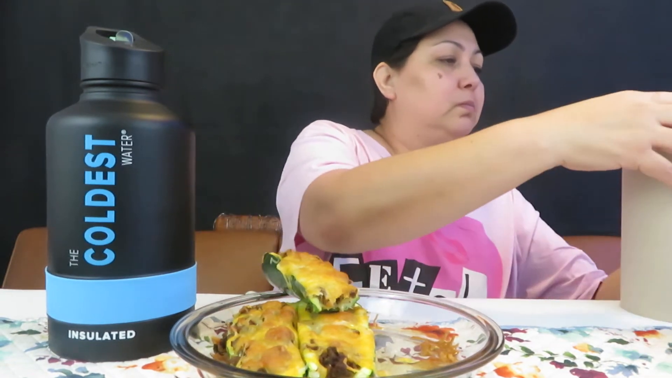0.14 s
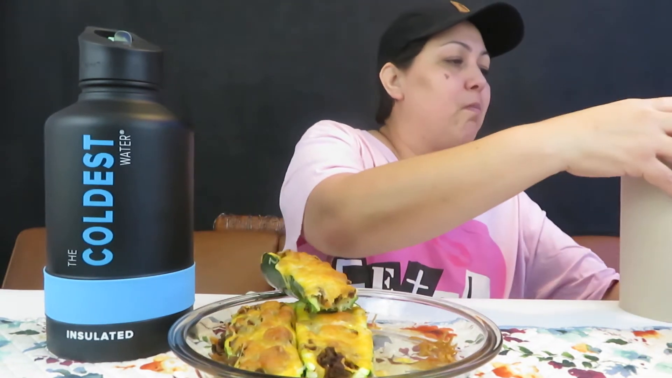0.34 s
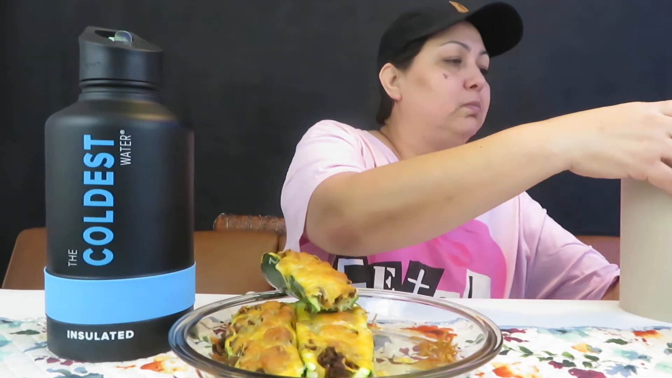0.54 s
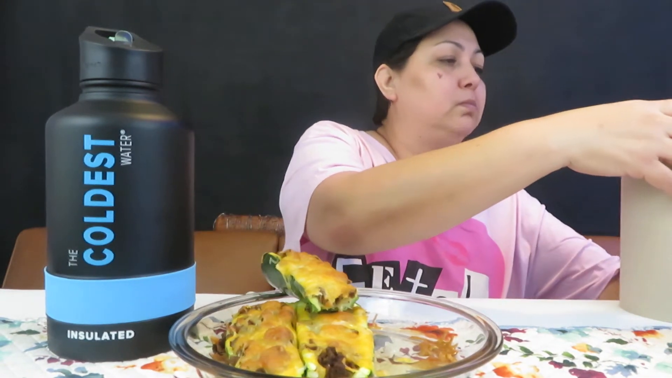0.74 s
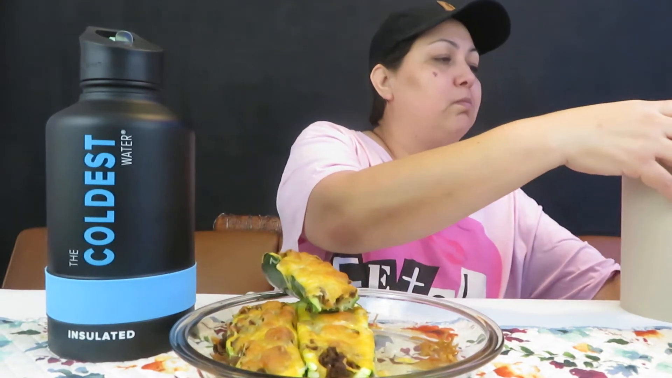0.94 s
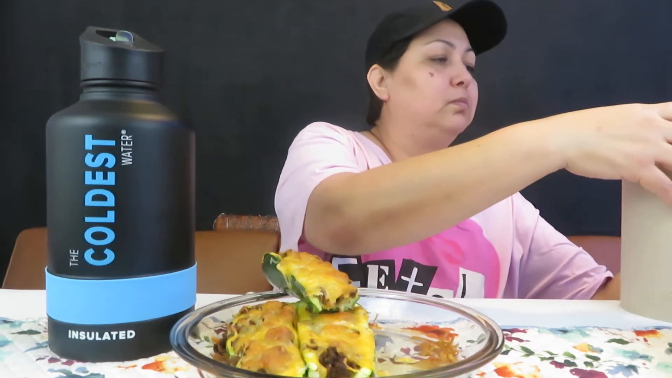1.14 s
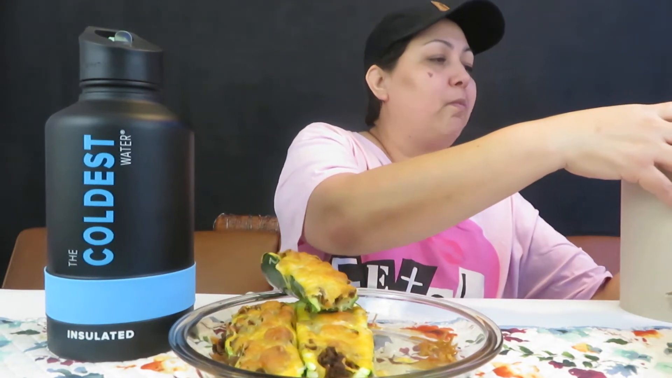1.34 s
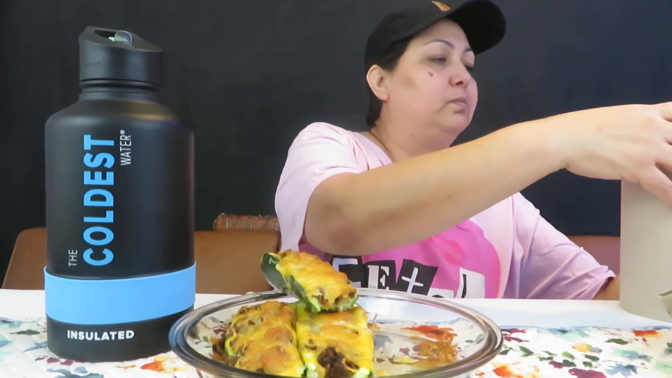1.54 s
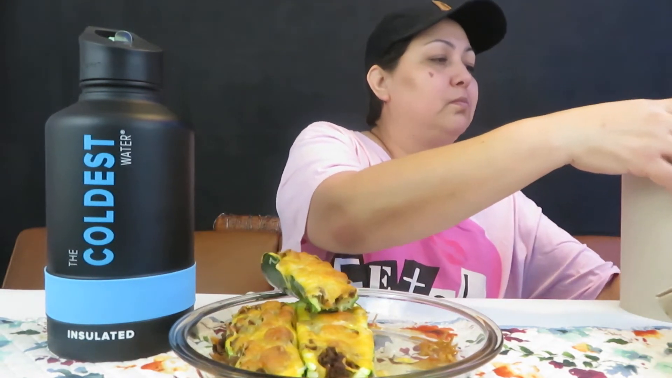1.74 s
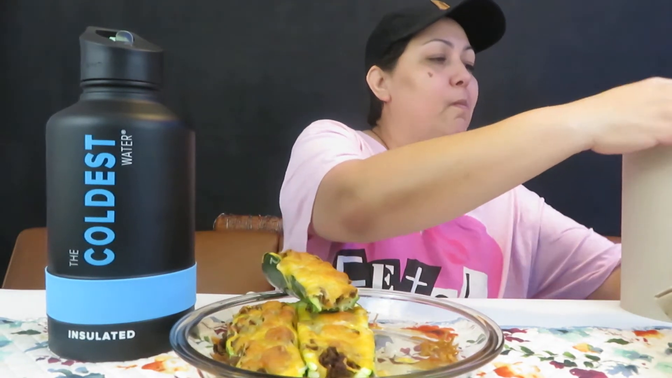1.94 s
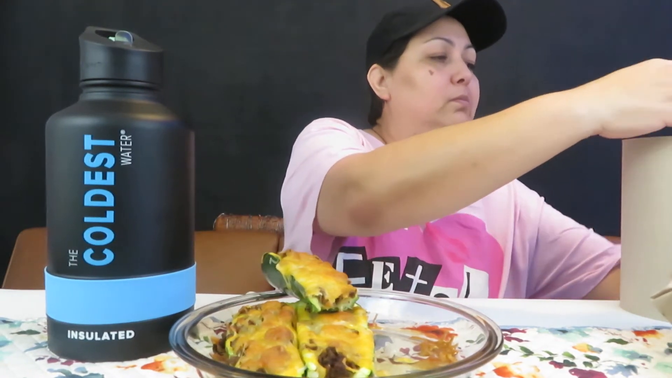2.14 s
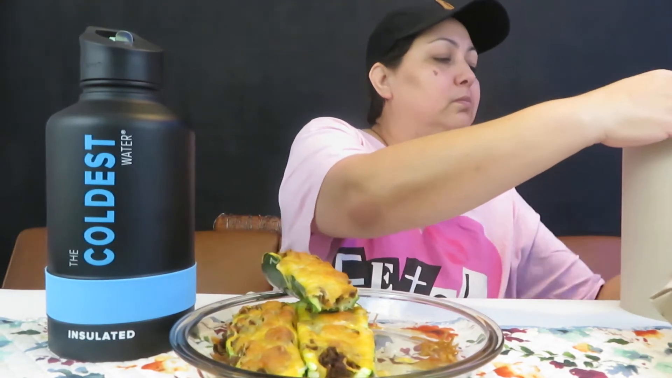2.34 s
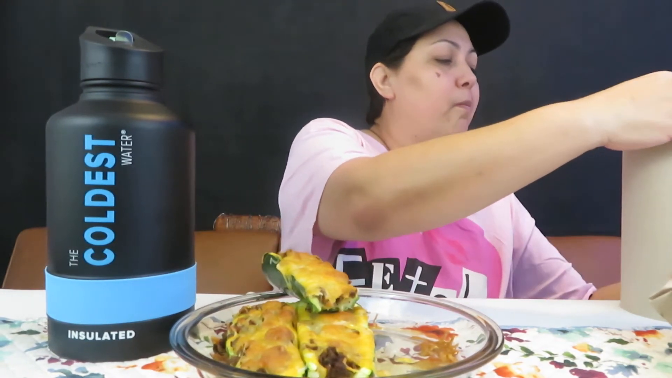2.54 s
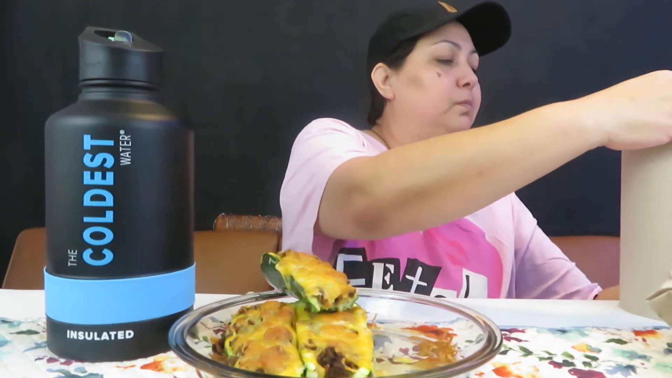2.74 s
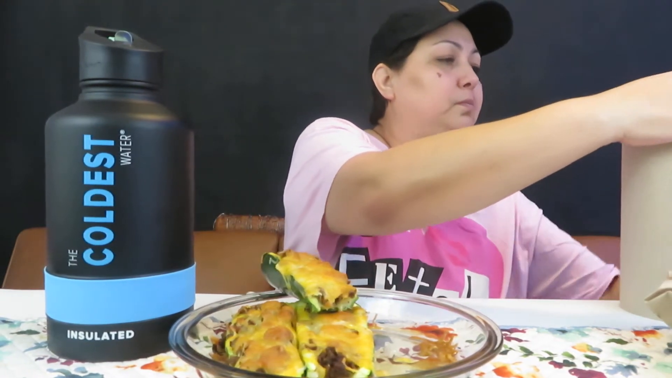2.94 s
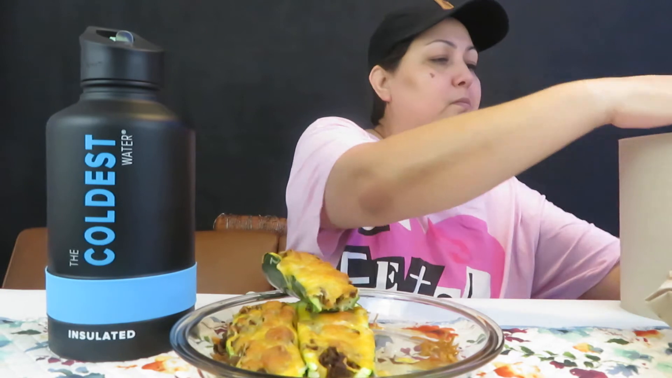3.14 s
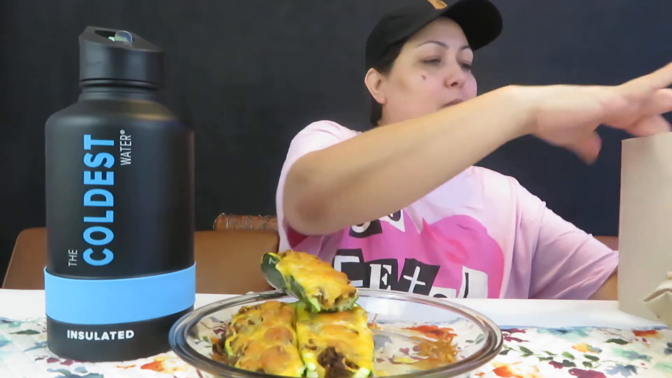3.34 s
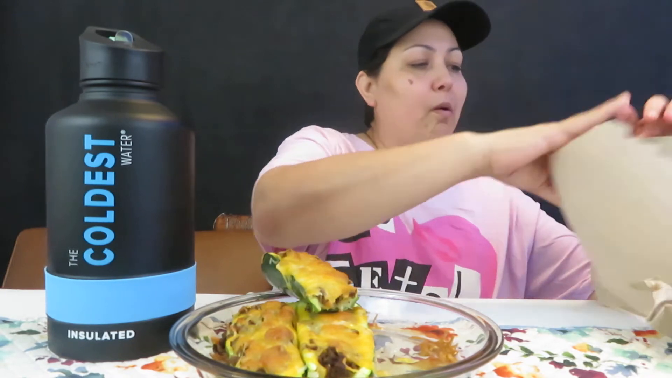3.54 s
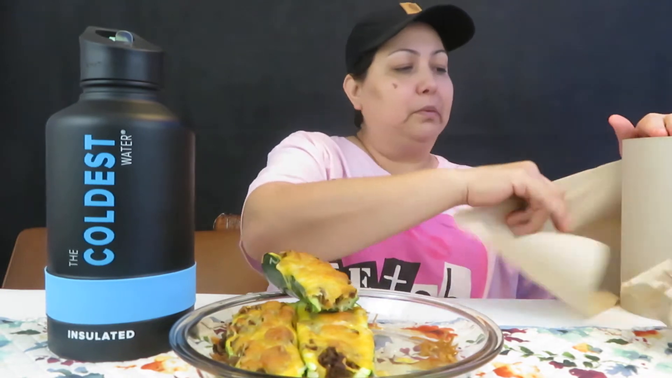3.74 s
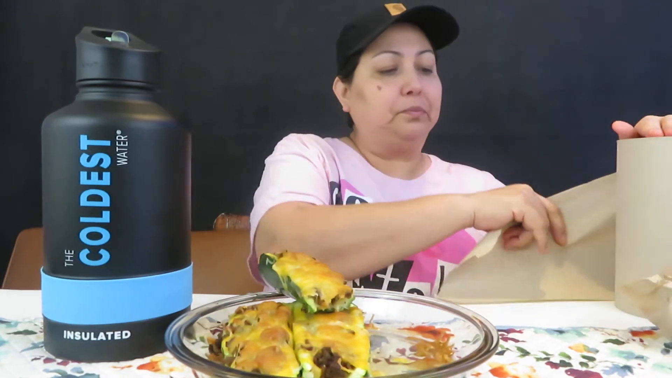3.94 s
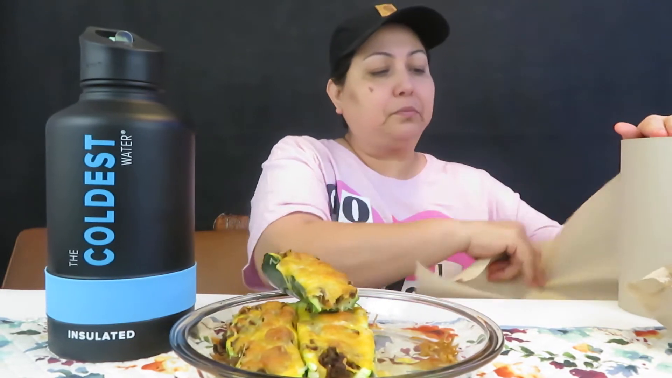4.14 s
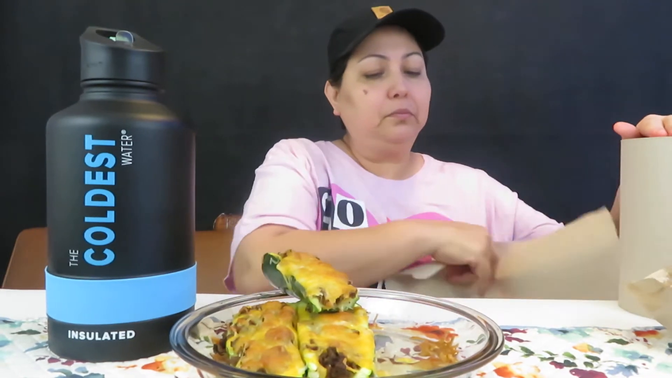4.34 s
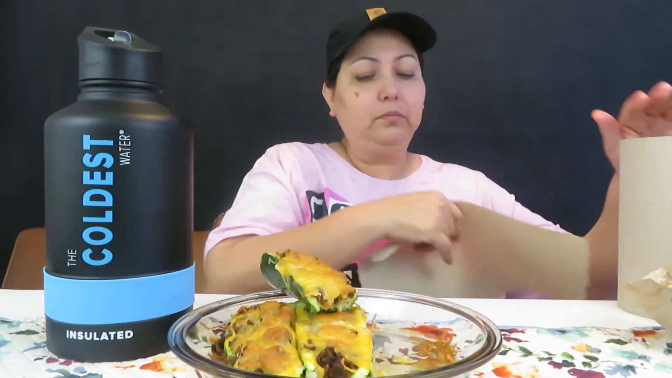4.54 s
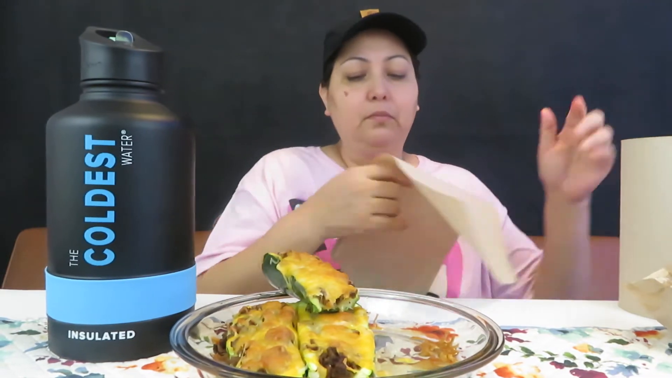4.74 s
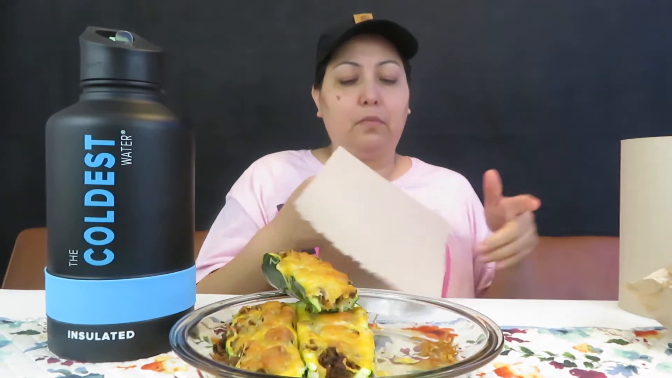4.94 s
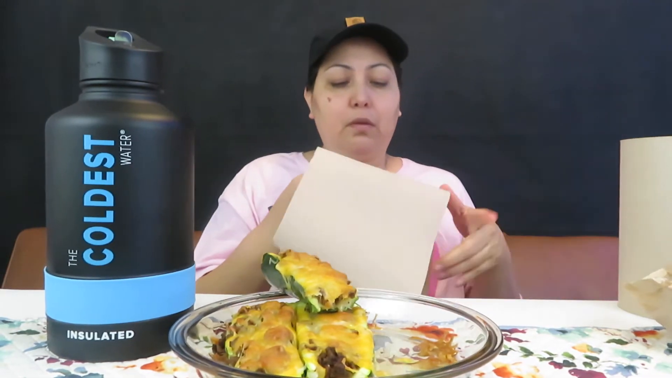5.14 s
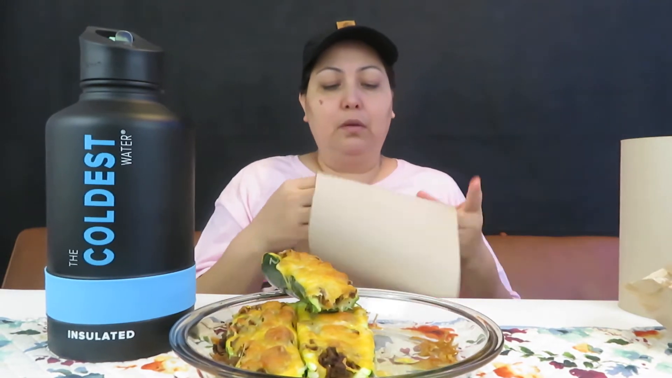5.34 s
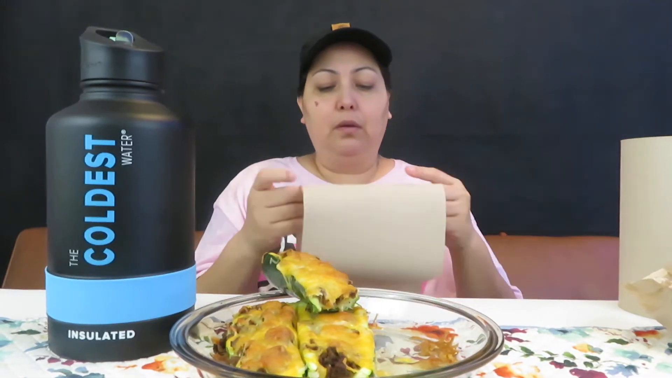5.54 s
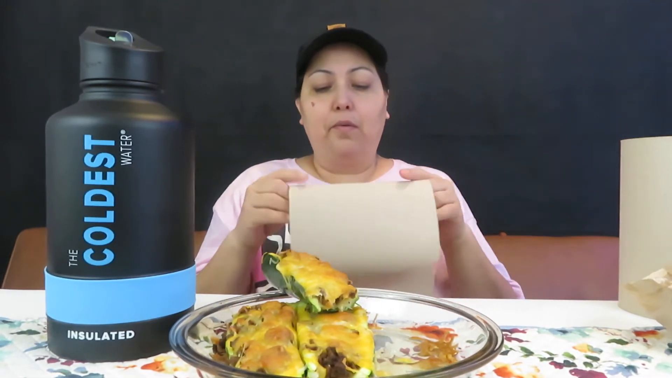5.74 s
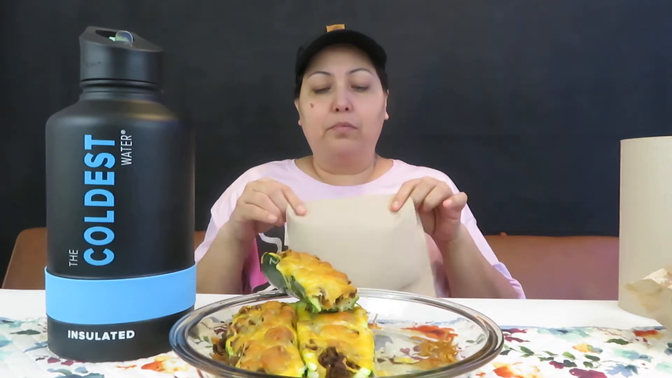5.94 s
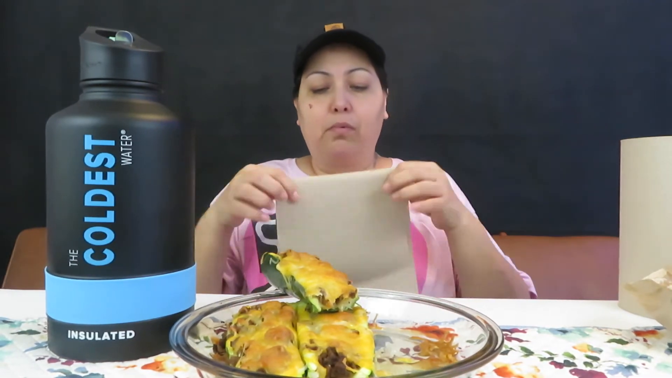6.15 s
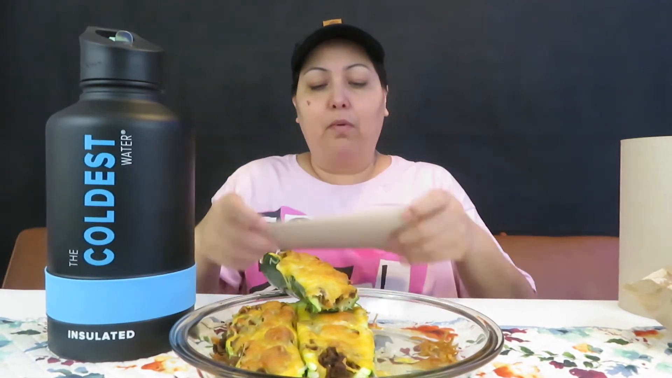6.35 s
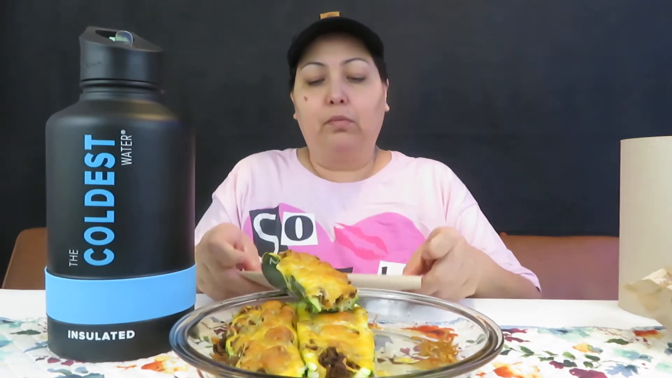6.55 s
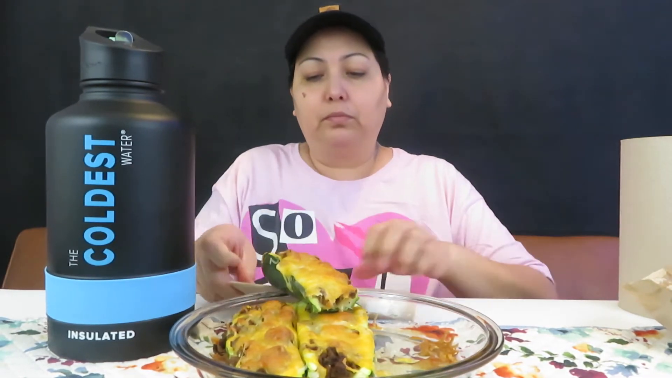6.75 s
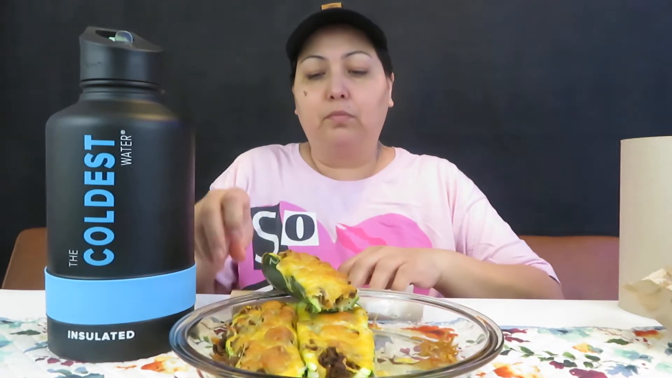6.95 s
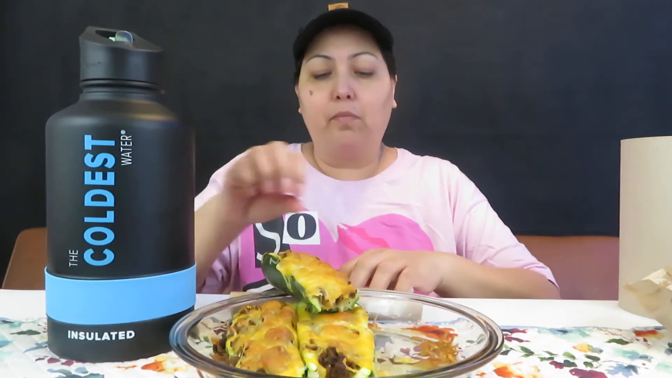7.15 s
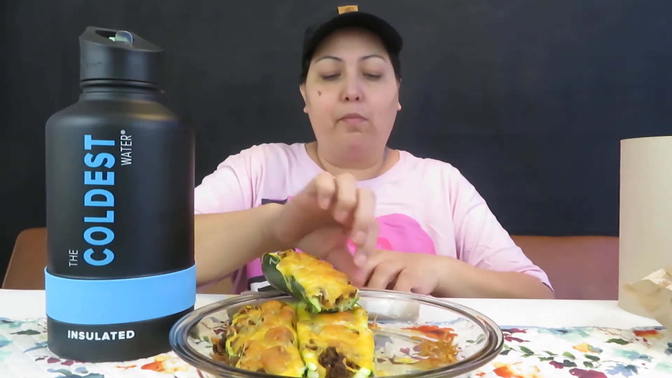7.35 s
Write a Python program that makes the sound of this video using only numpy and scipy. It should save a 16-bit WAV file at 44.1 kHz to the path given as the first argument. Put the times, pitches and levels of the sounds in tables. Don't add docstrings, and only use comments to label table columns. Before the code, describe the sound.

A small, quiet room with faint air and a very low appliance hum, heard through close stereo microphones. From 0 to 0.4 s a paper towel roll thumps dully on a table amid soft rustling. Until 3.3 s hands turn it with light, grainy, intermittent rustles, a knock near 2.2 s, two or three more around 3 s, and faint fingertip scuffs. From 3.4 s the rustle swells; the sheet tautens, buckles and pops, with a hollow papery resonance from 3.7 to 4.0 s. At 4.1 s the perforation gives way in a hard, overloaded crack, followed by strong rustling until about 4.5 s, while the background air dips briefly. Near 4.9 to 5.1 s a padded bench gives a faint low groan. From 5.1 s to the end the sheet is folded: soft crackles, small snaps near 5.4, 5.9 and 6.2 s, light table taps and subtle squeaks, fading to slight rustles after 7 s.

```python
import sys
import numpy as np
from scipy import signal
from scipy.fft import rfft, irfft, next_fast_len
from scipy.io import wavfile

SR = 44100
rng = np.random.default_rng(int(sys.argv[2]) if len(sys.argv) > 2 else 0)


def waveform_to_disk(signal):
    frames = np.transpose(np.atleast_2d(signal))
    scaled = np.clip(frames, -1, 1) * 32767
    samples = np.round(scaled).astype(np.int16)
    wavfile.write(sys.argv[1], SR, samples)


def elevation(decibels):
    levels = np.asarray(decibels, float)
    return 10 ** (levels / 20)


N = 326340
STEP = 32

# (pitch [Hz], width [Hz], level [dB])
HUM = [
    (107.4, 4.8, -65.5),
    (465, 13, -60),
]
# (frequency [Hz], level [dB])
AIR_SPECTRUM = [(15, -38), (25, 1), (48, -0.5), (113, 4), (289, -7.5), (339, -4), (468, 0), (613, -10),
                (2480, -9), (3610, -14.5), (11200, -35), (13500, -28), (15400, -74)]
# (frequency [Hz], left-right difference re sum [dB])
AIR_WIDTH = [(60, -22), (110, -18.5), (200, 1), (380, 1), (700, 1.5), (1290, -1), (2380, -7.5),
             (4390, -2.5), (8110, 1.5), (15000, -1)]
AIR_DB = -52
# (time [s], gain [dB])
DUCKING = [
    (4.05, 0),
    (4.12, -6),
    (4.55, -5),
    (4.7, 0),
]
ROOM_T60_S, ROOM_DB, WALL_CUT_HZ = 0.32, -16, 10200

# (peak time [s], peak level [dB], rise over 20 dB [s], fall over 20 dB [s])
LEANS = [(0.05, -37.5, .9, .3), (0.2, -29, .1, .16), (0.35, -38, .2, .1), (2.1, -50, .1, .2),
         (2.23, -42, .1, .07), (3.17, -46, .1, .3), (3.83, -47, .6, .25), (4.0, -37, .07, .05),
         (4.2, -41, .5, .2), (4.68, -48.5, .06, 3.0), (5.98, -53, .1, .4), (7.01, -48, .2, .07)]
LEANS_REST_DB = -55
# (frequency [Hz], level [dB])
TABLE_SPECTRUM = [(18, -46), (30, -20), (48, -22), (108, -3), (248, -11.5), (336, -2), (400, -18),
                  (520, -48), (880, -120)]
# (frequency [Hz], left-right difference re sum [dB])
TABLE_WIDTH = [(30, -41), (400, -22)]
# (time [s], slip rate [Hz], level [dB])
GROAN = [
    (4.64, 84, -66),
    (4.8, 82, -60),
    (4.87, 68, -52),
    (4.93, 81, -46.5),
    (5.0, 85, -45.5),
    (5.07, 82, -47.5),
    (5.13, 72, -70),
]
GROAN_CUT_HZ = 230

# (time [s], peak level [dB], pitch [Hz], T60 [s])
BUMPS = [(0.148, -21, 99.6, 0.19), (0.168, -24, 118, 0.073), (0.209, -27, 110, 0.08),
         (0.244, -26, 83.4, 0.13), (0.321, -34, 332, 0.15), (1.013, -36, 480, .05),
         (2.1995, -30.5, 410, 0.17), (2.207, -37, 900, 0.094), (2.222, -34, 195, .15),
         (2.939, -32, 380, 0.13), (3.148, -28.5, 368, 0.087), (3.207, -30, 335, 0.095),
         (5.797, -27, 530, 0.11), (6.025, -26.5, 570, 0.17), (6.694, -31.5, 468, 0.16),
         (6.950, -44, 450, .12)]
# (time [s], peak level [dB], pitch [Hz], T60 [s])
SQUEAKS = [(5.30, -37, 4100, 0.27), (0.625, -43, 5050, .4), (1.335, -36, 2700, 0.44),
           (1.86, -42, 3100, 0.17), (2.635, -41, 1980, 0.21), (3.478, -28, 3330, 0.22),
           (5.09, -36, 2620, 0.24), (5.42, -30, 1700, 0.6), (6.28, -28, 2000, .3), (6.952, -36, 1550, .3),
           (6.96, -40, 2470, 0.67), (7.285, -40, 2200, .4)]
# (time [s], peak level [dB], pitch [Hz])
SNAPS = [(0.474, -28, 1340), (0.629, -31, 1450), (0.807, -33, 1730), (1.596, -29, 1620), (1.867, -29, 3020),
         (2.99, -25, 1990), (3.431, -22, 1630), (3.483, -14, 1560), (3.656, -14, 1290), (3.68, -13.5, 1670),
         (3.809, -6, 945), (3.959, -10, 795), (4.147, -11, 795), (4.155, -7, 969), (4.229, -8, 1930),
         (4.479, -21, 1690), (4.788, -29, 1740), (5.118, -24, 1470), (5.225, -28, 1320), (5.376, -27, 990),
         (5.414, -20, 1410), (5.453, -16, 1630), (5.8, -23, 802), (5.855, -25, 1570), (5.948, -14.5, 1910),
         (6.048, -20, 1680), (6.169, -15.5, 1950), (6.297, -19, 1670), (6.564, -29, 1470),
         (6.951, -21, 1760),
         (3.707, -15, 1000),
    (3.79, -16, 450),
    (3.85, -12, 900),
    (3.885, -16, 800),
    (3.925, -14, 750),
    (4.001, -14, 760),
]
SNAP_T60_S = .026
# (time [s], peak level [dB], pitch [Hz], T60 [s])
TEAR = [
    (4.1002, 5, 1450, .012),
    (4.1024, 1, 1150, .012),
    (4.1056, -2, 1400, .012),
    (4.1103, -6, 1600, .015),
]

# (peak time [s], peak level [dB], rise over 20 dB [s],
# fall over 20 dB [s], fibre crispness re rustle [dB])
TURNING = [(0.089, -42.9, 0.022, 0.491, -17.0), (0.177, -39.0, 0.574, 0.415, -21.7),
           (0.335, -41.6, 0.01, 0.428, -18.8), (0.53, -38.6, 0.268, 0.24, -22.5),
           (0.639, -38.5, 0.126, 0.074, -17.0), (0.677, -50.5, 0.093, 0.346, -8.0),
           (0.825, -50.1, 0.184, 0.312, -5.5), (1.341, -32.7, 0.01, 0.135, -25.8),
           (1.399, -46.8, 0.125, 0.052, -17.2), (1.613, -41.7, 0.413, 0.155, -11.3),
           (1.732, -41.1, 0.069, 0.275, -14.5), (2.201, -36.8, 0.004, 0.108, -40.0),
           (2.325, -56.7, 0.019, 0.343, -10.2), (2.658, -39.2, 0.046, 0.122, -23.1),
           (2.87, -45.8, 0.416, 0.032, -10.6), (2.984, -32.8, 0.113, 0.203, -12.7),
           (3.1, -32.6, 0.136, 0.161, -19.0), (3.32, -42.3, 0.082, 0.124, -13.8)]
PULLING = [(3.432, -32.7, 0.006, 1.058, -20.2), (3.65, -25.3, 0.069, 0.796, -23.8),
           (3.794, -31.4, 0.445, 0.159, -11.3), (3.833, -26.7, 0.058, 0.254, -21.0),
           (3.968, -25.0, 0.713, 0.1, -28.2), (4.09, -28.6, 0.491, 0.03, -15.7),
           (4.101, -11.1, 0.002, 0.106, -35.2), (4.108, -17.2, 0.003, 0.197, -24.7),
           (4.196, -19.9, 0.143, 0.228, -20.4), (4.28, -14.0, 0.158, 0.127, -25.8),
           (4.485, -33.3, 0.019, 0.285, -17.4), (4.727, -35.5, 0.075, 0.298, -18.7)]
FOLDING = [(5.128, -35.4, 0.186, 0.078, -18.6), (5.218, -47.1, 0.062, 0.343, -13.6),
           (5.377, -37.8, 0.011, 1.94, -17.4), (5.41, -33.5, 0.052, 0.21, -18.9),
           (5.597, -40.4, 0.223, 0.154, -10.2), (5.822, -35.6, 0.231, 0.43, -13.8),
           (5.924, -29.8, 0.201, 0.624, -18.9), (6.05, -35.8, 0.068, 0.224, -9.5),
           (6.181, -38.5, 0.063, 0.037, -8.4), (6.306, -30.5, 0.081, 0.073, -16.3),
           (6.417, -41.5, 0.328, 0.178, -8.0), (6.567, -39.0, 0.054, 0.791, -16.1),
           (6.841, -44.5, 0.021, 0.409, -12.8), (6.974, -31.8, 0.026, 0.165, -23.3),
           (7.147, -51.5, 0.122, 0.153, -5.9), (7.275, -41.6, 0.163, 0.153, -22.9),
           (7.312, -43.3, 0.049, 0.175, -13.2)]
LOUDEST_RUSTLE_DB = -17
# (time [s], flapping re rustle [dB], sheet resonance [Hz])
SHEET = [(0.0, 4.7, 1630.0), (0.45, -8.4, 1970.0), (1.35, -14.5, 2170.0), (1.65, -10.1, 1870.0),
         (2.2, -5.1, 1320.0), (2.66, -20.8, 1820.0), (2.95, -4.4, 1890.0), (3.08, -19.6, 1920.0),
         (3.25, -4.6, 1890.0), (3.55, -11.9, 1690.0), (3.85, -6.4, 1640.0), (4.12, -1.5, 1520.0),
         (4.4, -14.5, 1870.0), (4.95, -2.8, 1470.0), (5.12, -11.0, 1690.0), (6.0, -10.0, 1710.0),
         (6.35, -15.6, 2010.0), (7.0, -14.8, 1760.0)]
# (time [s], level [dB])
CORE = [
    (3.6, 1.5),
    (3.8, 3),
    (4.0, 10),
    (4.2, 6),
    (4.35, 4),
]
CORE_HZ = 780
# (frequency [Hz], density [dB per Hz])
PAPER_SPECTRUM = [(82, -40), (140, -13), (192, -8.5), (308, -6.5), (367, -2), (555, -2), (731, -4.5),
                  (1000, -3.3), (1240, -1.5), (1400, -5), (1810, -3.5), (7160, -8.5), (11300, -16),
                  (15400, -19)]
# (frequency [Hz], left-right difference re sum [dB])
PAPER_WIDTH = [(60, -21), (110, -19), (200, -27), (380, -26), (700, -51), (1290, -26), (2380, -17),
               (4390, -3.5), (8110, -5), (15000, 6)]
# (time [s], left-right balance [dB])
HANDS_PAN = [
    (2.3, 0),
    (2.6, -.8),
    (3.4, -.8),
    (4.4, -.5),
    (4.6, 0),
]


def rms_one(x):
    return x / np.sqrt(np.mean(x ** 2) + 1e-20)


def in_time(rows, order=1):
    s, *columns = np.transpose(rows)
    return [np.interp(np.arange(0, N, order) / SR, s, c) for c in columns]


def at_hz(points, hz):
    table_hz, db = np.array(points).T
    return np.interp(np.log(hz), np.log(table_hz), db)


def per_sample(coarse):
    return np.interp(np.arange(N) / STEP, np.arange(len(coarse)), coarse)


def drift(rate):
    r = np.exp(-2 * np.pi * STEP * rate / SR)
    settle = 2500
    noise = rng.standard_normal(-(-N // STEP) + settle)
    return rms_one(signal.lfilter([1], [1, -2 * r, r * r], noise)[settle:])


def swells(rows):
    s, peak_db, rise_s, fall_s = np.transpose(rows)[:4, :, None]
    since = np.arange(-(-N // STEP)) * STEP / SR - s
    slope = np.where(since < 0, since / np.maximum(rise_s, .002), -since / fall_s)
    return elevation(peak_db + 20 * slope) ** 2


def resonate(drive, hz, r):
    return signal.lfilter([1, 0, -1], [1, -2 * r * np.cos(2 * np.pi * hz / SR), r * r], drive)


def bank(sources, edges, gain_db, width):
    out = 0
    for k, (low, high) in enumerate(zip(edges, edges[1:])):
        hz = np.sqrt(low * high)
        sos = signal.butter(2, [low, high], "band", fs=SR, output="sos")
        mid, apart = signal.sosfilt(sos, sources[k % len(sources)])
        stereo = mid + elevation(at_hz(width, hz)) * apart * [[1], [-1]]
        out = out + per_sample(elevation(gain_db(hz))) * stereo
    return out


def steady(spectrum, edges, width, patchy_db):
    white = rng.standard_normal((2, 2, N))

    def colour_db(hz):
        return at_hz(spectrum, hz) + patchy_db * drift(5.5)
    return rms_one(bank(white, edges, colour_db, width))


def bursts(events, cycles, crack_db, spray):
    out, span = np.zeros(N + SR), np.arange(SR // 4) / SR
    for s, peak_db, hz, t60 in events:
        drive = spray * rng.standard_normal(len(span)) * elevation(-60 * span / max(t60, .005))
        drive[0] += 1.5
        tone = resonate(drive, hz, np.exp(-np.log(1000) * hz / (cycles * SR)))
        crack = signal.lfilter([.3], [1, -.7], np.diff(drive, prepend=0))
        burst = tone / np.abs(tone).max() + elevation(crack_db) * crack
        out[round(s * SR):][:len(span)] += elevation(peak_db) * burst
    return out[:N]


def hum():
    out = np.zeros(N)
    for hz, width, level_db in HUM:
        tone = resonate(rng.standard_normal(N), hz, np.exp(-np.pi * width / SR))
        out += elevation(level_db) * rms_one(tone)
    return out


def room_air():
    edges = 22 * 2 ** np.arange(0, 9.6, .5)
    return elevation(AIR_DB + 3.0) * steady(AIR_SPECTRUM, edges, AIR_WIDTH, patchy_db=1.5)


def ducking():
    return elevation(in_time(DUCKING)[0])


def room(x):
    size = next_fast_len(N + SR)
    phase = -2j * np.pi * np.arange(size // 2 + 1) / size
    turn = np.exp(phase)
    dull = np.exp(-2 * np.pi * WALL_CUT_HZ / SR)
    walls = np.zeros((2, len(turn)), complex)
    lags = (rng.uniform(.008, .03, 12) * SR).astype(int)
    for k, lag in enumerate(lags):
        fade = elevation(-60 * lag / SR / ROOM_T60_S)
        loop = fade * (1 - dull) / (1 - dull * turn) * np.exp(lag * phase)
        walls[k // 6] += (-1) ** k * loop / (1 - loop)
    echoes = irfft(rfft(x, size) * walls, size)[:, :N]
    side_db = -24.5
    return echoes[0] + elevation(side_db) * echoes[1] * [[1], [-1]]


def table_rumble():
    power = per_sample(swells(LEANS).sum(axis=0))
    level = np.sqrt(power + elevation(LEANS_REST_DB) ** 2)
    return level * steady(TABLE_SPECTRUM, 30 * 2 ** np.arange(0, 4, .5), TABLE_WIDTH, patchy_db=3.0)


def bench_groan():
    slips_hz, level_db = in_time(GROAN)
    slips = np.diff(np.floor(np.cumsum(slips_hz / SR)), prepend=0)
    padding = signal.butter(2, [70, GROAN_CUT_HZ], "band", fs=SR, output="sos")
    return elevation(level_db) * rms_one(signal.sosfilt(padding, slips))


def table_bumps():
    return bursts(BUMPS, cycles=6.5, crack_db=-20, spray=0.17)


def finger_squeaks():
    return bursts(SQUEAKS, cycles=41.0, crack_db=-42, spray=3.0)


def crease_snaps():
    events = [(*snap, SNAP_T60_S) for snap in SNAPS]
    return elevation(-3.5) * bursts(events, cycles=6.2, crack_db=-21, spray=0.29)


def tear():
    return bursts(TEAR, cycles=11, crack_db=-22, spray=.2)


def strokes():
    rows = np.array(TURNING + PULLING + FOLDING)
    power = swells(rows) + 1e-12
    total = power.sum(axis=0)
    crisp = (power * elevation(rows[:, -1:]) ** 2).sum(axis=0) / total
    return per_sample(10 * np.log10(total)), 10 * np.log10(crisp)


def grains(per_s, spread_db):
    shape = (2, 2, N)
    sizes = elevation(spread_db * np.minimum(rng.exponential(1, shape), 5)) * rng.choice([-1, 1], shape)
    return rms_one(sizes * (rng.random(shape) < per_s / SR) + 1e-18)


def clumps(per_s, fade_s, depth):
    slips = rng.exponential(1, N) * (rng.random(N) < per_s / SR)
    settling = signal.lfilter([1], [1, -np.exp(-1 / (fade_s * SR))], slips)
    return rms_one(1 + depth * settling)


def rustle():
    level_db, crisp_db = strokes()
    level_db = np.minimum(level_db, LOUDEST_RUSTLE_DB)
    flap_db, peak_hz = in_time(SHEET, order=STEP)
    core_db = in_time(CORE, order=STEP)[0]

    def colour_db(hz):
        flap_tilt_db = (flap_db + 6) * np.clip(np.log2(1150 / hz) / 0.89, 0, 1)
        crisp_tilt_db = (crisp_db + 7.5) * np.clip(np.log2(hz / 2800), 0, 1)
        sheet_db = 5.3 * np.exp(-.5 * (np.log2(hz / peak_hz) / .36) ** 2)
        hollow_db = core_db * np.exp(-.5 * (np.log2(hz / CORE_HZ) / 0.25) ** 2)
        patch_db = 1.8 * drift(14)
        return at_hz(PAPER_SPECTRUM, hz) + flap_tilt_db + crisp_tilt_db + sheet_db + hollow_db + patch_db

    fibres = grains(per_s=9000, spread_db=2.0) * clumps(per_s=61, fade_s=0.0032, depth=0.2)
    edges = 140 * 2 ** np.arange(0, 6.9, .27)
    return elevation(level_db + 8.0) * bank(fibres, edges, colour_db, PAPER_WIDTH)


def scene():
    air = (room_air() + hum()) * ducking()
    table = table_rumble() + bench_groan()
    knocks = table_bumps() + finger_squeaks() + crease_snaps() + tear()
    soft = signal.butter(2, 4500, fs=SR, output="sos")
    knocks = signal.sosfilt(soft, knocks)
    pan = elevation(in_time(HANDS_PAN)[0] * [[.5], [-.5]])
    paper = (rustle() + knocks) * pan
    return paper + elevation(ROOM_DB) * room(paper.mean(axis=0)) + table + air


def low_pass(x):
    return signal.sosfilt(signal.butter(12, 15580, fs=SR, output="sos"), x)


def record(dry):
    heard = signal.sosfilt(signal.butter(8, 13200, fs=SR, output="sos"), dry)
    mix = np.clip(heard, -1, 1)
    return low_pass(mix)


dry = scene()
out = record(dry)
waveform_to_disk(out)
```